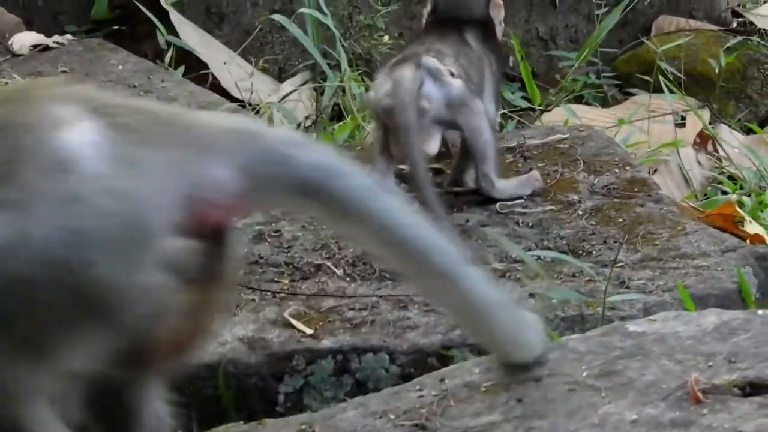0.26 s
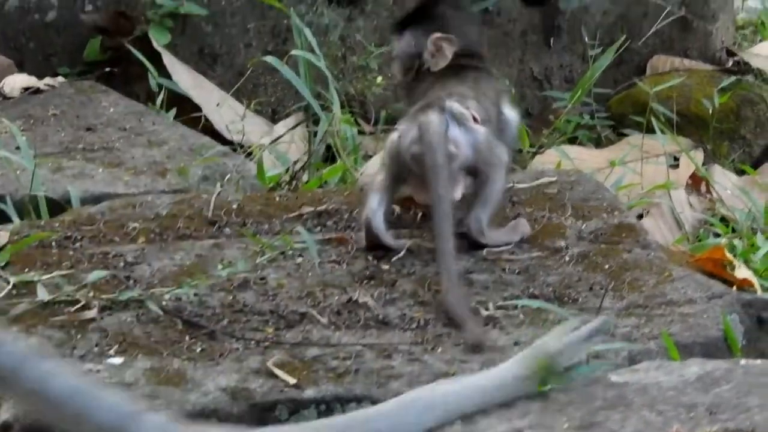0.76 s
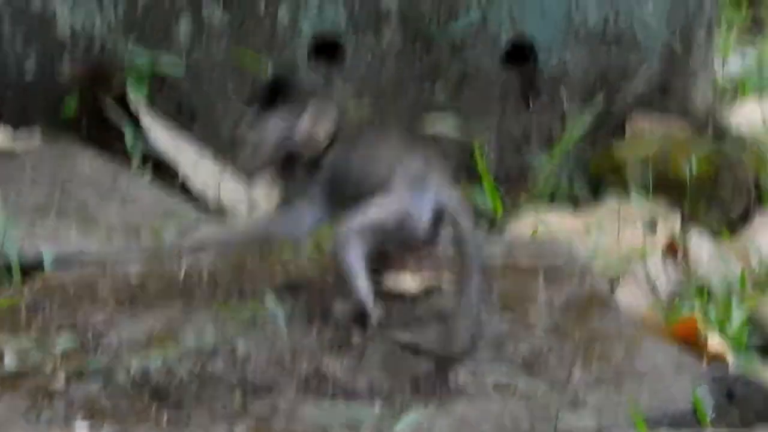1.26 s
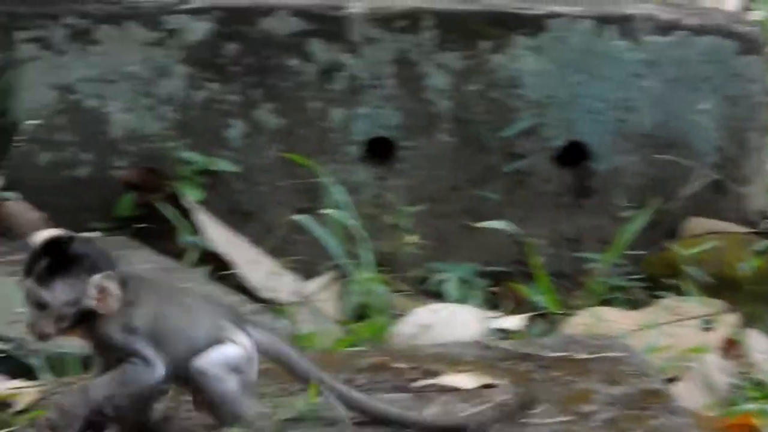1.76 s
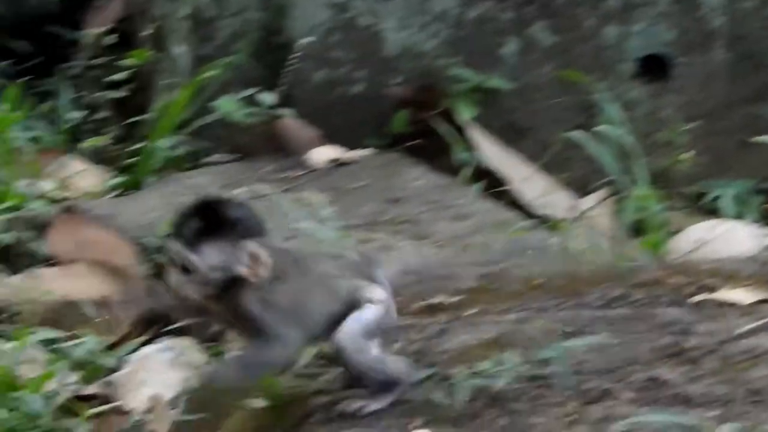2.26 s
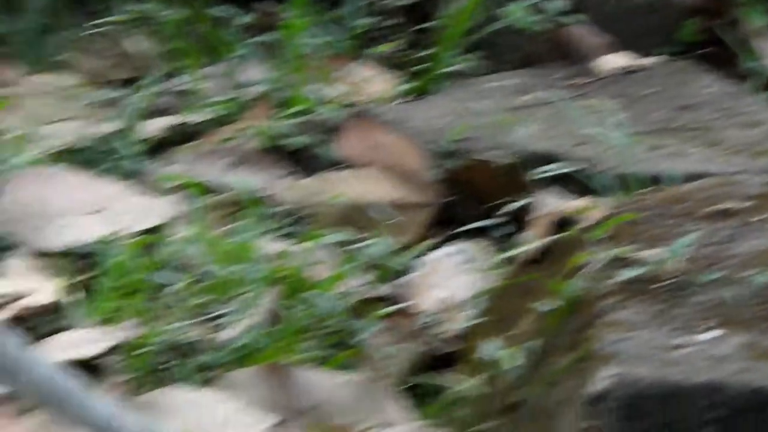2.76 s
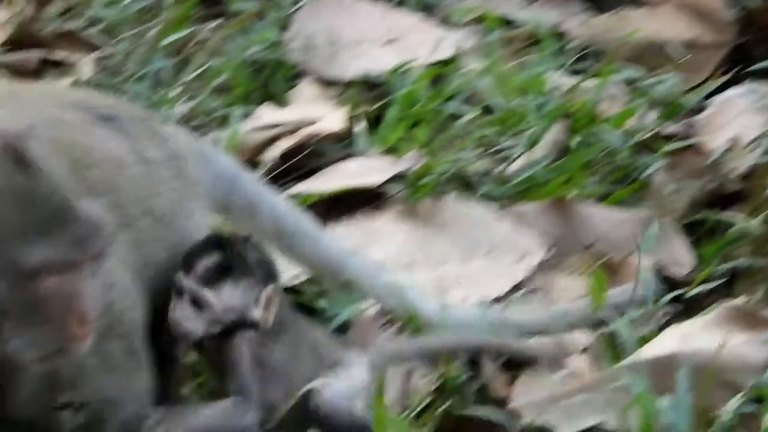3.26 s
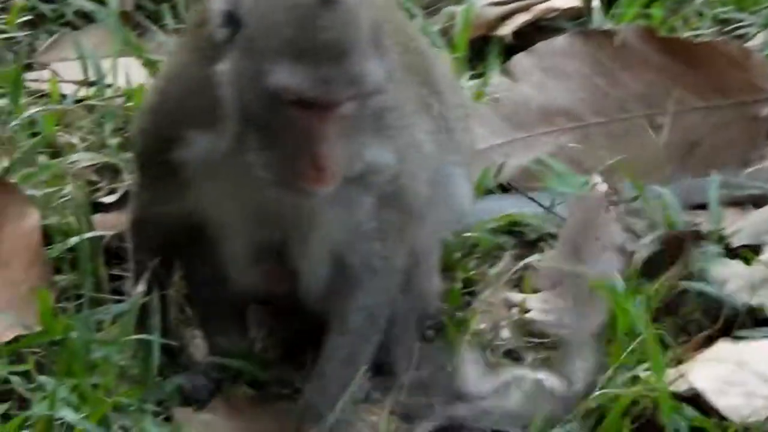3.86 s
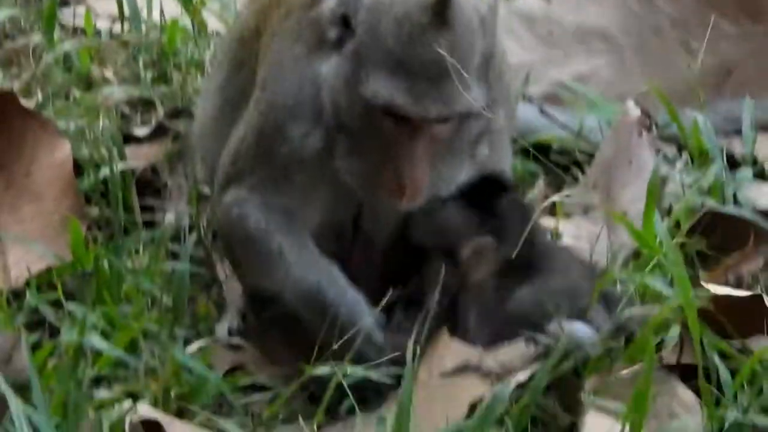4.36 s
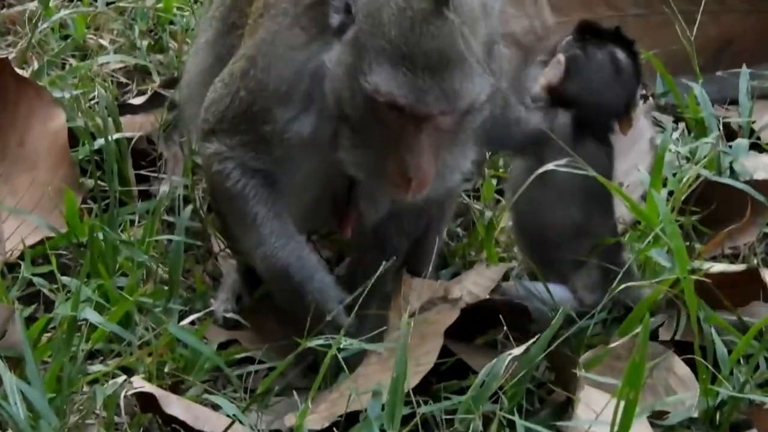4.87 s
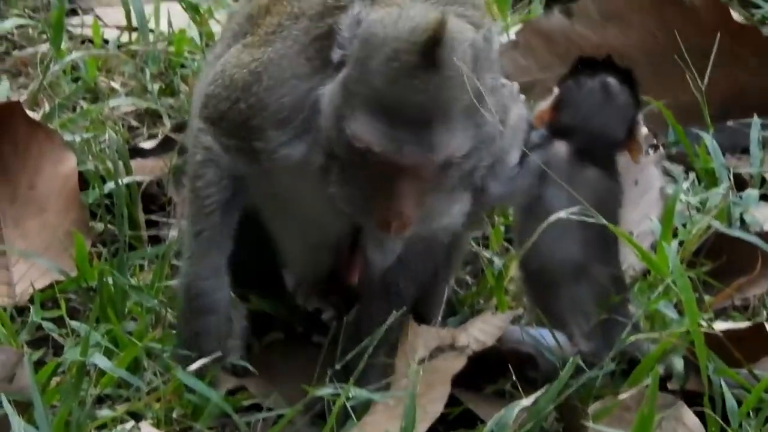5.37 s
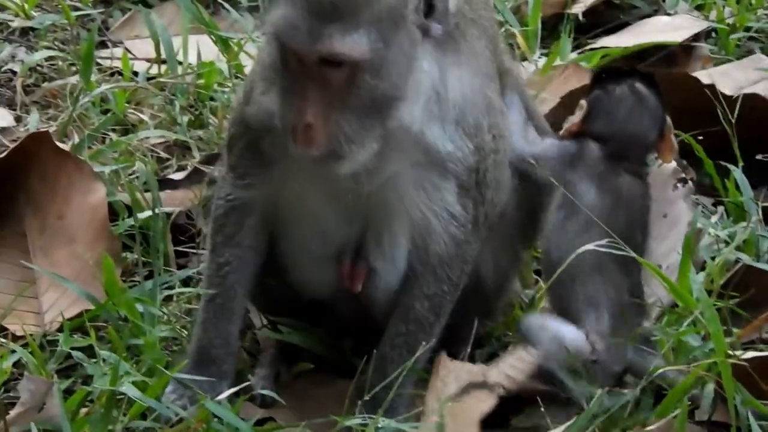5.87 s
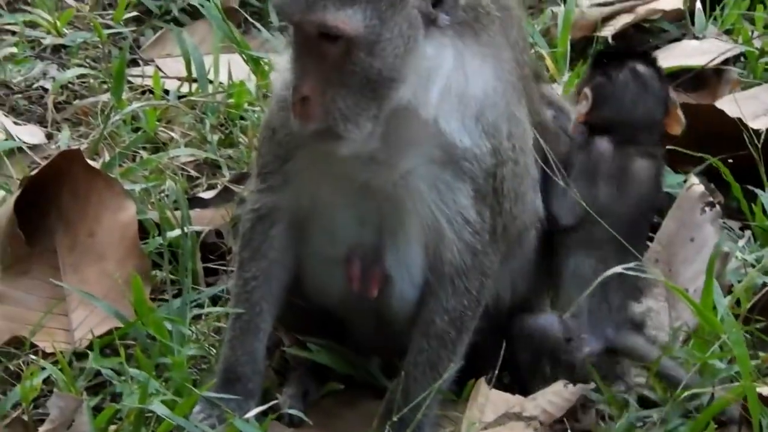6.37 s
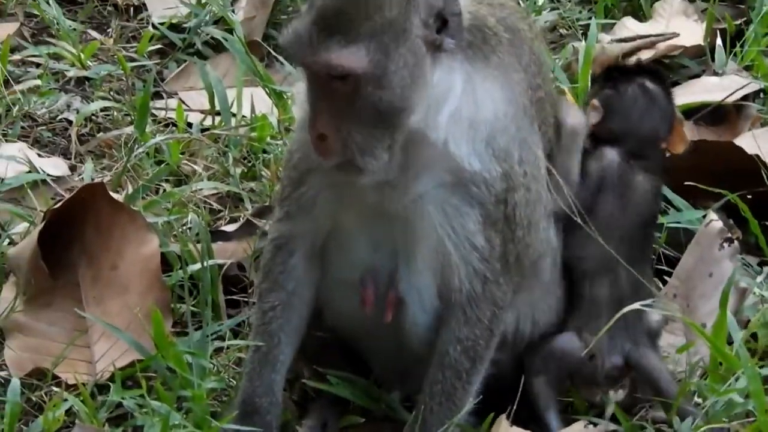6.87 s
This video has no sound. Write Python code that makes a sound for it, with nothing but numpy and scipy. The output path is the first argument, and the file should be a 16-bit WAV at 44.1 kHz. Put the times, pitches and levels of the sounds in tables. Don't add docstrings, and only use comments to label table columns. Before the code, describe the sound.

Shrill insects hold a layered whine as small feet crunch leaf litter close by, a faint motor ticks regularly and distant birds pipe.

```python
import sys
import numpy as np
from scipy import signal
from scipy.fft import rfft, irfft
from scipy.io import wavfile
from scipy.ndimage import uniform_filter1d, map_coordinates

SR = 44100
rng = np.random.default_rng(int(sys.argv[2]) if len(sys.argv) > 2 else 0)


def invert_db(x):
    u = np.asarray(x, float) / 20
    return 10 ** u


def file_out(sig):
    cols = np.atleast_2d(sig).T
    lim = np.clip(cols, -1, 1)
    pcm = np.round(lim * 32767).astype(np.int16)
    wavfile.write(sys.argv[1], SR, pcm)


N = 313992
HZ = np.maximum(np.fft.rfftfreq(N, 1 / SR), 1)

# t/s, level/dB
CHORUS_LEVEL = [(0.0, -49), (0.1, -51), (1.74, -47), (1.94, -54), (2.0, -47.5), (2.79, -51.5),
                (2.81, -46.5), (3.41, -51.5), (3.47, -48), (5.41, -50.5), (5.43, -44.5), (5.61, -54),
                (5.77, -46.5), (6.6, -53.5), (6.72, -45.5), (7.12, -52)]
# t/s, level/dB
DRUM_LEVEL = [(0, -62.5), (.5, -50.5), (1.1, -64.5), (1.65, -54.5), (1.9, -62), (2.15, -51.5), (2.4, -57.5),
              (3.3, -52.5), (3.55, -55.5), (3.95, -49), (4.45, -68), (4.6, -54), (4.75, -57.5),
              (4.95, -51.5), (5.6, -60.5), (5.85, -51.5), (6.5, -54), (7.12, -57)]
# f/Hz, scatter/Hz, level/dB
SINGER_GROUPS = [
    (2702, 12, 0),
    (2700, 32, -15),
    (2600, 42, -12),
]
# level over chorus/dB, share of swell followed/1
UPPER_HARMONICS = [(0, 1.1), (-3.5, 0.12), (-21, 0.12), (-30.5, 0.12)]
# left-right likeness/0-1, left minus right/dB
HARMONIC_SIDES = [(0.64, 3.5), (0.63, 1.4), (0.83, -1.4), (0.66, 0.5), (0, -0.5)]
# t/s, level/dB, brightness per step up in pitch/dB
LEAF_STIR = [(0, -66, 2.5), (.5, -61, 1), (.75, -63.5, 2.5), (1.1, -67.5, 3), (1.43, -67.5, 1),
             (1.95, -64, 3.5), (2.42, -67, 2.5), (2.7, -62.5, 0), (3.1, -60.5, -.5), (3.75, -57, 1),
             (4.0, -55.5, 1.5), (4.42, -69, 2.5), (4.62, -72.5, 4), (4.95, -61, 0), (5.45, -62, 0),
             (6.15, -70.5, 4.5), (6.45, -66.5, 3.5), (7.12, -63, 0)]
# f/Hz, level/dB
RUSTLE_COLOUR = [(230, -13), (450, -15.5), (750, -8), (1300, -2.5), (2200, -3), (3800, -2.5), (5000, 1.5),
                 (5950, 2), (6900, -1.5), (8600, 5), (10000, -4.5), (11300, -13.5), (13000, -41),
                 (15600, -42)]
# t/s, peak/dB, f/Hz, left minus
# right/dB
STEP_KNOCKS = [(0.605, -36, 2200, 3), (0.921, -32.5, 2080, 0), (1.235, -39, 1160, -2),
               (1.515, -48, 1900, 2.5), (2.485, -41, 1530, -1), (2.507, -28, 1550, -2),
               (2.588, -35, 2140, -10), (2.68, -33, 1490, 3), (2.715, -38, 2420, -1),
               (2.845, -38.5, 1770, 1), (2.913, -40.5, 880, 5), (3.036, -50, 2040, 10),
               (3.316, -44, 1390, 8), (3.352, -33, 1210, -1), (3.414, -32.5, 2250, -2),
               (3.46, -38, 2130, -6), (3.514, -39, 1090, .5), (3.702, -37, 1360, 0),
               (3.798, -20.5, 1420, 1), (3.85, -27.5, 1580, -3), (3.935, -34, 1450, 2),
               (3.951, -18.5, 2250, -1), (4.271, -44.5, 1580, 4), (4.613, -21.5, 1490, -1),
               (5.037, -49, 1500, 7), (6.98, -43, 1190, 1.5)]
# t/s, peak/dB, f/Hz, left minus right/dB
TWIG_CRACKS = [(0.921, -33.5, 4350, 5), (1.486, -42, 4770, .5), (2.506, -36.5, 3630, 13),
               (2.6928, -30.5, 4260, -1), (2.98, -31.5, 4250, 5), (3.3643, -28.5, 3900, 1.5),
               (3.4717, -30, 4630, 1), (3.6194, -31, 4300, 3), (3.7983, -26, 3440, 0),
               (3.815, -20, 3800, 2), (3.9558, -27, 4350, -3), (3.9615, -20, 4350, 1),
               (4.289, -47, 3870, 21), (4.6257, -28, 4340, 3)]
# t/s, peak/dB, left minus right/dB
LEAF_SNAPS = [(0.605, -38, 13), (1.246, -19, 4.5), (2.517, -24, -5), (2.589, -27, 1), (2.9777, -28.5, -5),
              (3.364, -29, -1), (3.473, -30, -11), (3.769, -28, -6), (3.8102, -22, -13), (3.828, -17.5, -4),
              (3.9534, -20, -11), (3.963, -18, -6), (3.9765, -27, -12), (4.15, -34, -2), (5.3004, -40, -17)]
# t/s, peak/dB, t60/s, left minus right/dB
DULL_SETTLING = [(1.49, -48, 0.93, -6.5), (2.507, -29.5, 1.7, 1.5), (3.354, -29.5, 0.33, -3),
                 (3.46, -29.5, 0.4, 0), (3.698, -34.5, 1.6, -3), (3.802, -13, 0.24, 0.5),
                 (3.828, -24.5, .17, -2), (3.953, -18.5, 0.25, 0), (4.615, -32.5, 0.73, -1.5),
                 (4.766, -32.5, 0.19, 2), (6.361, -33, 0.15, -1), (6.721, -43, 0.51, 0),
                 (6.987, -40, 0.74, 4)]
# t/s, peak/dB, t60/s, left minus right/dB
BRIGHT_SETTLING = [(1.245, -28.5, 0.56, 13), (1.4894, -34.5, 2.1, 1), (2.5158, -23, 1.05, 1),
                   (2.587, -29.5, 0.76, 0), (3.474, -29.5, 0.32, -3), (3.5994, -40, 0.33, 5),
                   (3.8125, -12.5, 0.18, 1), (3.8294, -33, 0.21, -13), (3.9547, -18, 0.3, 1),
                   (5.2914, -48, 0.65, -12), (6.3609, -46, 0.96, 1.5), (6.724, -35, 0.44, -1)]
# t into turn/s, level/dB, f/Hz
MOTOR_CONTACTS = [
    (.032, 0.95, 1060),
    (.113, -0.21, 1200),
    (.313, -1.6, 1270),
]
MOTOR_TURNS_DB = [-44, -42, -62, -49, -44, -45.5, -44.5, -44.5]
# start/s, end/s, start f/Hz, end f/Hz, level/dB
MOTOR_WHINE = [
    (2.84, 3.6, 690, 653, -68),
]
# start/s, end/s, start f/Hz, end f/Hz, level/dB
BIRD_NOTES = [
    (4.64, 4.8, 1750, 1670, -61),
    (4.66, 4.76, 3370, 3440, -61.5),
    (5.15, 5.36, 3690, 3460, -56),
    (6.32, 6.63, 3760, 3870, -61),
    (6.73, 6.9, 3830, 3750, -65),
    (6.94, 7.11, 1900, 1835, -60.5),
]
# t/s, level/dB
RUMBLE_LEVEL = [(0.0, -68), (0.32, -69.5), (0.42, -58), (0.54, -72.5), (1.78, -70.5), (1.9, -62),
                (1.98, -72.5), (3.47, -61.5), (3.63, -56), (3.67, -60), (4.2, -54), (4.6, -65.5),
                (4.98, -59.5), (5.71, -66), (6.41, -64), (7.12, -72.5)]
# f/Hz, density/dB per Hz
RUMBLE_SHAPE = [(13, -51), (22, -16), (119, 1.5), (183, -5), (260, -27), (340, -31), (570, -120)]
# f/Hz, likeness/0-1
SIDE_LIKENESS = [(60, 0.9), (200, 1), (300, 0.3), (1300, 0.67), (3800, 0.24), (9000, 1)]
# f/Hz, lead/rad
LEFT_LEAD = [(60, 0.35), (200, 0.32), (1300, 0.089), (2700, 0.4), (5400, 0.77), (6700, 1.43), (8100, 1.59),
             (10800, 2), (15000, 0.99)]
# f/Hz, left minus right/dB
SIDE_BALANCE = [(60, -3), (200, 0), (700, 1), (3800, 2), (6700, -1.5), (9000, -1)]


def rms_one(x):
    return x / np.sqrt(np.mean(x ** 2) + 1e-30)


def in_time(rows):
    s, *columns = np.transpose(rows)
    return np.array([np.interp(np.arange(N) / SR, s, c) for c in columns])


def at_hz(points):
    f_hz, values = np.transpose(points)
    return np.interp(np.log(HZ), np.log(f_hz), values)


def drift(rate_hz):
    steps_at = np.arange(0, N + 64, 64)
    slow = map_coordinates(rng.standard_normal(400), [steps_at * min(rate_hz, 50) / SR], order=3)
    return np.interp(np.arange(N), steps_at, slow)


def right_delay():
    return np.exp(-1j * at_hz(LEFT_LEAD))


def diffuse(shared, own, alike, balance_db):
    alike = np.clip(alike, 0, 1)
    common, apart = np.sqrt(1 + alike) * shared, np.sqrt(1 - alike) * own
    left = (common + apart) * invert_db(balance_db / 2)
    right = (common - apart) * invert_db(-balance_db / 2) * right_delay()
    return np.array([left, right])


def heard(spectra):
    x = irfft(spectra, N)
    return x / np.sqrt(np.mean(x.mean(axis=0) ** 2))


def cicadas(swell_db, wander_db):
    level_db = in_time(CHORUS_LEVEL)[0]
    mean_db = level_db.mean()
    levels = [in_time(DRUM_LEVEL)[0]]
    levels += [mean_db + db + follows * (level_db - mean_db) for db, follows in UPPER_HARMONICS]
    out = 0
    for order, (slow_db, (alike, balance_db)) in enumerate(zip(levels, HARMONIC_SIDES), 1):
        power = 0
        for hz, wide_hz, db in SINGER_GROUPS:
            power = power + invert_db(2 * db) * np.exp(-.5 * ((HZ / order - hz) / wide_hz) ** 2)
        shared, own = rfft(rng.standard_normal((2, N))) * np.sqrt(power)
        flutter_db = wander_db * drift(5.4) + swell_db * drift(36)
        out = out + invert_db(slow_db + 2.5 + flutter_db) * heard(diffuse(shared, own, alike, balance_db))
    return out


def leaves(grains_per_s, grain_db, patchy_db):
    sizes = invert_db(7.1 * np.minimum(rng.exponential(1, (2, N)), 3.6)) * rng.choice([-1, 1], (2, N))
    born = rng.random((2, N)) < grains_per_s * invert_db(5.0 * drift(25)) / SR
    source = rng.standard_normal((2, N)) + invert_db(grain_db) * rms_one(sizes * born)
    shared, own = rfft(source) * invert_db(at_hz(RUSTLE_COLOUR))
    spectra = diffuse(shared, own, at_hz(SIDE_LIKENESS), at_hz(SIDE_BALANCE))
    level_db, bright_db = in_time(LEAF_STIR)
    quarter_octave, together, out = 4 * np.log2(HZ / 200), drift(9), 0
    for k in range(26):
        pitch_step = np.interp(np.log(200 * 2 ** (k / 4)), np.log([1300, 3800, 9300]), [0, 1, 2])
        band = np.cos(np.pi / 2 * np.clip(quarter_octave - k, -1, 1)) ** 2
        flicker_db = patchy_db * (0.5 * together + 0.3 * drift(7.6) + 0.82 * drift(20))
        out = out + invert_db(level_db + pitch_step * bright_db + flicker_db) * irfft(spectra * band, N)
    return out * np.sqrt(SR / 2 / 1800) * invert_db(-0.36)


def blows(events, spread, rise_s, grit, trim_db):
    out, t = np.zeros((2, N + SR)), np.arange(SR // 3) / SR
    draws = rng.standard_normal((len(events), 4, len(t)))
    for (s, peak_db, hz, t60_s, pan_db), draw in zip(events, draws):
        clumps = draw[3] + 3.1 * uniform_filter1d(draw[3], size=80)
        burst = (draw[0] + 0.47 * draw[1:3]) * invert_db(grit * clumps)
        edges_hz = [hz / (1 + spread), min(hz * (1 + spread), 20000)]
        resonance = signal.butter(2, edges_hz, "band", fs=SR, output="sos")
        burst = rms_one(signal.sosfilt(resonance, burst))
        shape = (1 - np.exp(-t / rise_s)) * invert_db(-60 * t / max(t60_s, .005)) * (1 - t / t[-1])
        sides_db = np.array([[.5], [-.5]]) * pan_db
        at = max(round(s * SR) - 30, 0)
        out[:, at:at + len(t)] += burst * shape * invert_db(peak_db + trim_db + sides_db)
    return out[:, :N]


def knocks():
    events = [(s, db, hz, 0.038, pan) for s, db, hz, pan in STEP_KNOCKS]
    return blows(events, spread=0.17, rise_s=.003, grit=2.0, trim_db=-1.5)


def cracks():
    events = [(s, db, hz, 0.051, pan) for s, db, hz, pan in TWIG_CRACKS]
    return blows(events, spread=0.063, rise_s=0.00067, grit=2.2, trim_db=-8.5)


def snaps():
    longer_s_per_db = .003
    events = [(s, db, 8990, 0.07 + longer_s_per_db * (db + 20), pan) for s, db, pan in LEAF_SNAPS]
    return blows(events, spread=0.06, rise_s=0.00073, grit=4, trim_db=-5)


def sparks():
    events = [(s, db, 12300, 0.027, pan) for s, db, pan in LEAF_SNAPS]
    return blows(events, spread=0.086, rise_s=0.0004, grit=3.0, trim_db=-33)


def settling():
    dull = [(s, db, 1840, t60_s, pan) for s, db, t60_s, pan in DULL_SETTLING]
    bright = [(s, db, 8170, t60_s, pan) for s, db, t60_s, pan in BRIGHT_SETTLING]
    out = blows(dull, spread=0.92, rise_s=0.006, grit=3.6, trim_db=-13)
    return out + blows(bright, spread=.32, rise_s=0.0083, grit=3.6, trim_db=-8.5)


def motor_ticks():
    turn_s, t60_s, pan_db = .3998, 0.096, 4.5
    events = []
    for turn, turn_db in enumerate(MOTOR_TURNS_DB):
        for s, db, hz in MOTOR_CONTACTS:
            peak_db = turn_db + db + 2.0 * rng.standard_normal()
            events.append((turn * turn_s + s, peak_db, hz, t60_s, pan_db))
    return blows(events, spread=0.29, rise_s=0.0015, grit=1.4, trim_db=-7)


def steps_and_ticks():
    top_hz = 10030
    hits = knocks() + motor_ticks() + cracks() + snaps() + settling()
    left, right = rfft(hits) / np.sqrt(1 + (HZ / top_hz) ** 15.3)
    return sparks() + irfft([left, right * right_delay()], N)


def held_notes(notes, blur_hz, steady):
    t, out = np.arange(N) / SR, 0
    for start, end, hz0, hz1, db in notes:
        pitch_hz = np.interp(t, [start, end], [hz0, hz1])
        noise = rng.standard_normal(N) + 1j * rng.standard_normal(N)
        paths = signal.lfilter(*signal.butter(2, blur_hz, fs=SR), noise)
        fade = np.clip(np.minimum(t - start, end - t) / 0.006, 0, 1)
        tone = (steady + paths / np.std(paths)) * np.exp(2j * np.pi * np.cumsum(pitch_hz) / SR)
        out = out + invert_db(db) * fade * tone.real
    return out


def motor_whine():
    return held_notes(MOTOR_WHINE, blur_hz=40, steady=.2)


def birds():
    return held_notes(BIRD_NOTES, blur_hz=90, steady=.2)


def rumble():
    colour = invert_db(at_hz(RUMBLE_SHAPE)) * (HZ < 300) / np.sqrt(1 + (38 / HZ) ** 6)
    shared, own = rfft(rng.standard_normal((2, N))) * colour
    spectra = diffuse(shared, own, at_hz(SIDE_LIKENESS), at_hz(SIDE_BALANCE))
    return invert_db(in_time(RUMBLE_LEVEL)[0] + 1.74 * drift(12)) * heard(spectra)


def hiss():
    band = signal.butter(2, [210, 520], "band", fs=SR, output="sos")
    return invert_db(-86) * rms_one(signal.sosfilt(band, rng.standard_normal((2, N))))


def scene():
    chorus = cicadas(swell_db=2.5, wander_db=1.0)
    ground = leaves(grains_per_s=1500., grain_db=-3, patchy_db=3.8) + steps_and_ticks()
    return chorus + ground + motor_whine() + birds() + rumble() + hiss()


def band_limit(x):
    return signal.sosfilt(signal.butter(12, 15700, fs=SR, output="sos"), x)


def record(dry):
    return band_limit(dry)


dry = scene()
out = record(dry)
file_out(out)
```